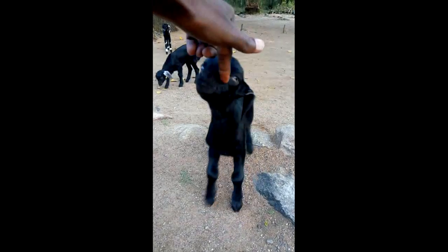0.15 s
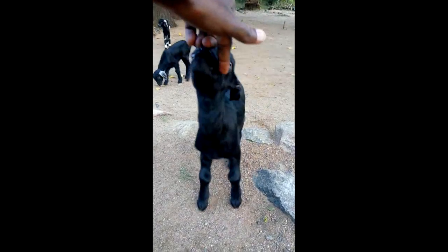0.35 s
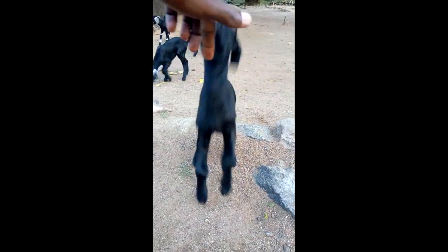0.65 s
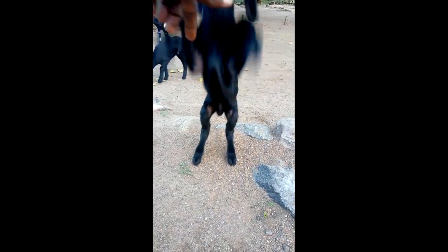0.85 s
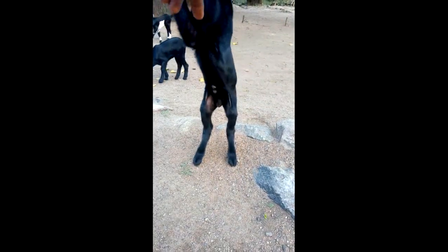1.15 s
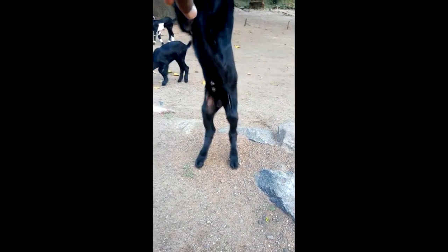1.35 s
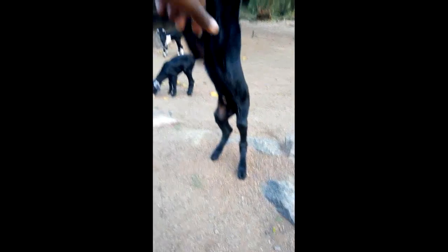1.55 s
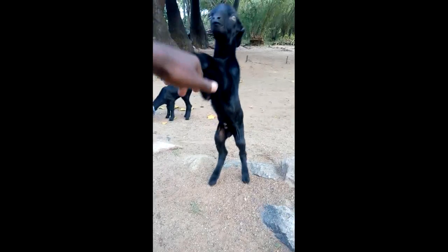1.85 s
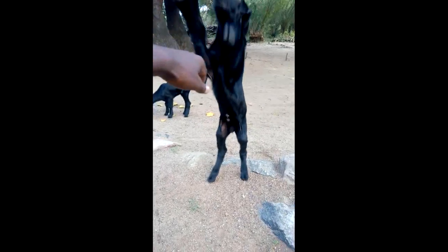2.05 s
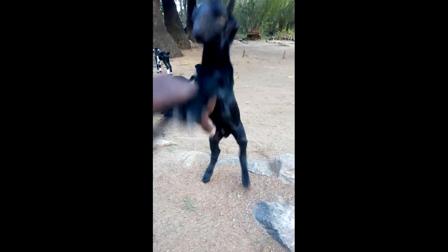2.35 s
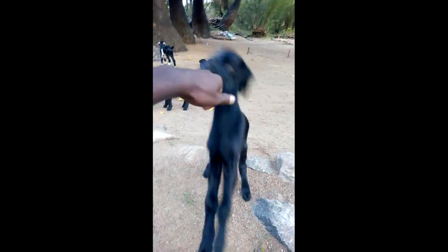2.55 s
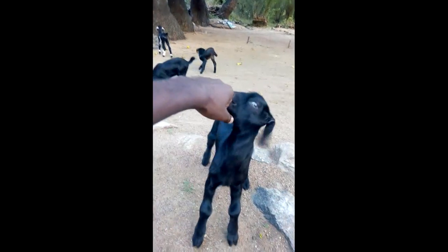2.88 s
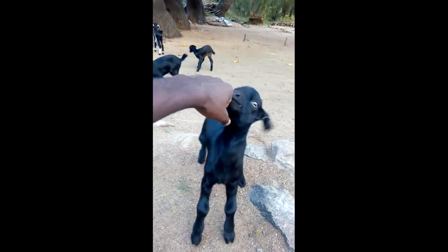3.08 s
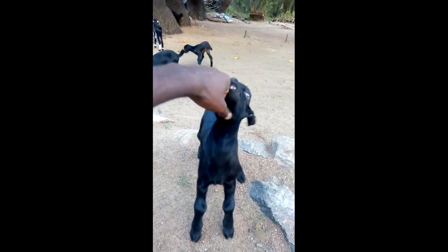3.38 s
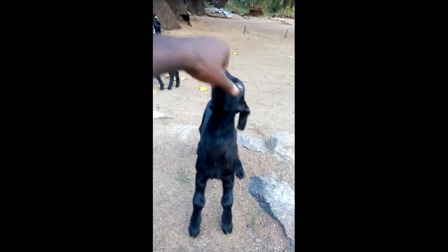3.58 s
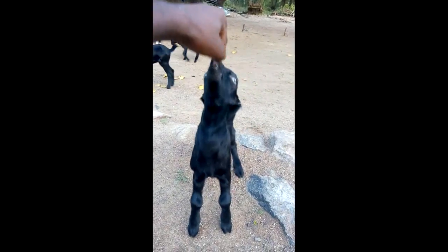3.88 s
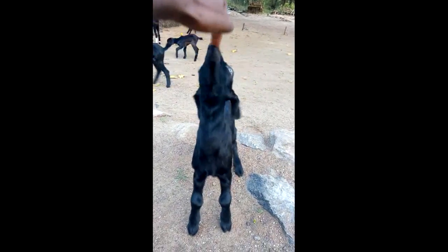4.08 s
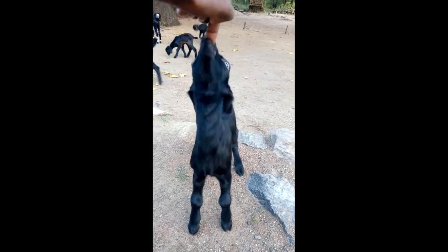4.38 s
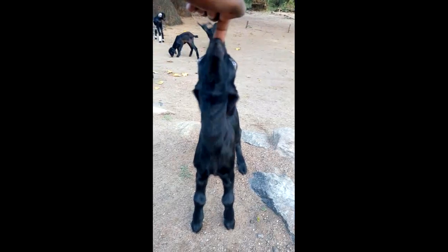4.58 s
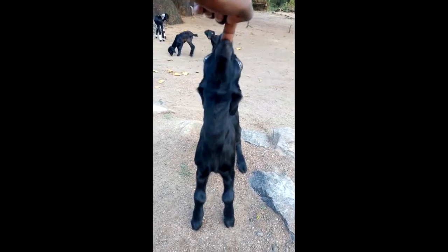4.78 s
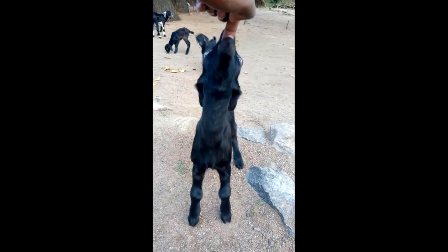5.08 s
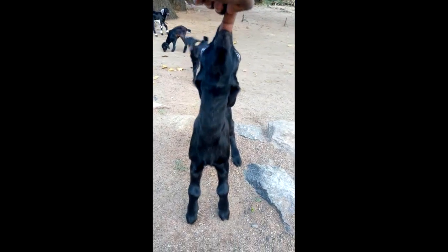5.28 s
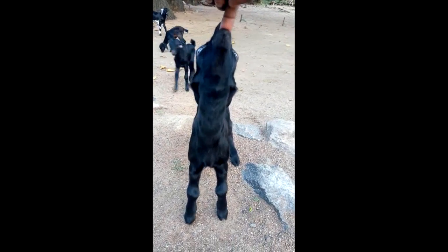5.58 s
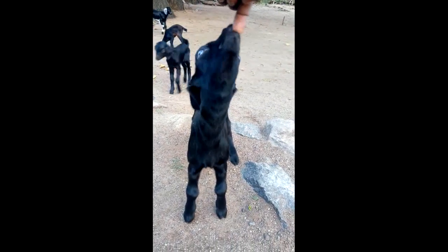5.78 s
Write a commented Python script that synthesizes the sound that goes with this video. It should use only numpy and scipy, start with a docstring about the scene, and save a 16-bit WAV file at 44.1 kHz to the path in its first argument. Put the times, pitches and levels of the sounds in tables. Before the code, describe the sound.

Young goats bleat outdoors on a farm, their trembling calls coming first from a distance and then from right by the microphone. After the loudest bleat, a crow gives three evenly spaced, rasping caws while another kid answers faintly. Hooves lightly scuff the gritty ground and dull thuds sound on the left. The calls carry a slight echo over quiet rumble and hiss.

```python
"""Goat kids near and far bleat in a bare farmyard: pushes of the belly drive the vocal folds, so each
call throbs about eleven times a second; the near kid opens with a yelp. Then a crow caws three times from
a tree, its voice chopped by a fluttering membrane. Far animals call faintly, two birds chirp, hooves
scuff the grit and a hollow body thuds on the left, over distant rumble and hiss. Reflections from walls
and trunks give the calls a tail; two microphone ports hear them unequally."""
import sys
import numpy as np
from scipy import signal
from scipy.fft import rfft, irfft, next_fast_len
from scipy.io import wavfile
from scipy.ndimage import uniform_filter1d

SR = 44100
rng = np.random.default_rng(int(sys.argv[2]) if len(sys.argv) > 2 else 0)


def to_wav(sig):
    """Store sig (one row per channel, or 1-D mono) as 16-bit WAV at the path in sys.argv[1].

    Samples outside -1..1 are clipped; the rate is SR.
    """
    pcm = np.clip(np.atleast_2d(sig), -1, 1) * 32767
    pcm = np.round(pcm).astype(np.int16)
    wavfile.write(sys.argv[1], SR, pcm.T)  # frames by channels


N = 261954


def gain_of(db):
    """Amplitude ratio of a level in decibels."""
    return 10 ** (np.asarray(db) / 20)


def unit_rms(x):
    """Normalisation to a mean power of one."""
    return x / np.sqrt(np.mean(x ** 2) + 1e-20)


def curve_at(points, hz, column=1):
    """Interpolation of a table on a logarithmic frequency axis."""
    table = np.transpose(points)
    return np.interp(np.log(hz + 1), np.log(table[0] + 1), table[column])


def add(mix, start_s, sound):
    """Superposition: a sound joins the mix at its start time."""
    part = mix[..., max(round(start_s * SR), 0):][..., :sound.shape[-1]]
    part += sound[..., :part.shape[-1]]


def wobble(size, hz):
    """Low-pass noise of rms 1, changing about hz times a second."""
    span = int(SR / hz)
    return unit_rms(uniform_filter1d(uniform_filter1d(rng.standard_normal(size), span), span))


def resonate(x, hz, width_hz):
    """A movable resonance by heterodyning: shift hz down to zero, smooth, shift back."""
    carrier = np.exp(2j * np.pi * np.cumsum(hz * np.ones(len(x))) / SR)
    pole = np.exp(-np.pi * width_hz / SR)
    return 2 * (carrier * signal.lfilter([1 - pole], [1, -pole], x / carrier + 1e-18)).real


def panned(x, db, lag_samples=0):
    """Direction cues: the left is db louder, the right lags."""
    return np.array([x, np.roll(x, lag_samples)]) * gain_of([[db / 2], [-db / 2]])


def air():
    """Distant rumble and hiss: partly coherent noise whose slow swell moves the bass most."""
    # Each row: frequency in Hz, relative spectral density in dB.
    spectrum = [(20, -31.5), (50, -34.5), (90, 7), (170, 0), (300, -7), (450, -9), (750, -17.5),
                (1200, -20), (2300, -18), (3200, -26), (5000, -24), (7000, -25), (9000, -34.5),
                (12500, -41), (15000, -29.5)]
    # Each row: frequency in Hz, left-right correlation.
    coherence = [(60, 0.54), (180, 0.94), (550, 0.9), (1650, 0.04), (4970, 0.077), (15000, 0.47)]
    frames, hz = N // 256 + 5, np.fft.rfftfreq(1024, 1 / SR)
    a, b, c, d, patches = rng.standard_normal((frames, 513, 5)).T
    patches = unit_rms(uniform_filter1d(uniform_filter1d(patches, 8, 0), 14, 1))
    swell = unit_rms(uniform_filter1d(rng.standard_normal(frames), 30))
    shared = curve_at(coherence, hz)[:, None]
    left, independent = a + 1j * b, c + 1j * d
    spectra = np.array([left, shared * left + np.sqrt(1 - shared ** 2) * independent])
    spectra *= gain_of(curve_at(spectrum, hz)[:, None] + 2 * patches + 3.5 * swell / (1 + hz[:, None] / 600))
    return gain_of(-63.5) * unit_rms(signal.istft(spectra, nperseg=1024, noverlap=768)[1][:, :N])


def calls_and_yelp():
    """Faint calls, chirps and the yelp that opens the near kid's bleat: three gliding harmonics."""
    # Each row: start and length in seconds, level in dB, first, middle and last pitch in Hz,
    # tilt in dB per harmonic. The yelp starts at 3.11 s.
    calls = [(0.0, 0.045, -63.5, 412, 393, 410, -20), (0.257, 0.039, -64.5, 2303, 2150, 1800, -30),
             (0.911, 0.19, -58.5, 299.7, 414, 370, -25), (1.096, .07, -62, 330, 314, 260, -21),
             (1.954, 0.039, -60, 333, 310, 270, -18), (1.987, 0.12, -63.5, 457, 375, 470, -28),
             (2.36, 0.13, -55.5, 619, 674, 570, 6), (2.8, 0.15, -61, 493, 505, 550, 5.5),
             (3.11, 0.0686, -50.5, 445, 545, 570, -8), (3.253, 0.21, -52, 621, 626, 577, -18.5),
             (3.561, .11, -54, 548, 520, 460, -35), (3.853, 0.2, -56.5, 563, 650, 740, -32),
             (3.861, 0.11, -64.5, 386, 405, 460, -23), (4.062, 0.2, -60, 373, 430, 290, -15),
             (4.54, .14, -54.5, 581, 630, 750, 6.5), (4.766, 0.29, -59.5, 297.4, 390, 270, -28),
             (4.822, 0.23, -50, 697.5, 680, 760, -22), (4.994, 0.11, -61, 310, 350, 280, -21),
             (5.499, 0.05, -59, 420, 410, 470, -24.5), (5.633, 0.18, -65.5, 441, 420, 400, -16),
             (5.657, 0.013, -62.5, 4150, 4100, 6100, -31)]
    out = np.zeros((2, N))
    for start, length, db, *glide_hz, tilt_db in calls:
        progress = np.arange(0, length, 1 / SR) / length
        level = gain_of(db + np.interp(progress, [0, .2, .63, 1], [-9.5, 0, 0, -9.5]))
        hz = np.interp(progress, [0, .5, 1], glide_hz)
        cycles = np.cumsum(hz * (1 + .015 * wobble(len(hz), 100))) / SR
        note = sum(gain_of(tilt_db * k) * np.cos(2 * np.pi * k * cycles) for k in range(1, 4))
        add(out, start, level * unit_rms(note) * signal.windows.tukey(len(hz), .2))
    return out


def hoof_scuffs():
    """Granular noise: grit grains of very unequal size make short band-limited scuffs and knocks."""
    # Each row: start in seconds, level in dB, length in seconds, centre in Hz, left minus right in dB.
    scuffs = [(.005, -69, 0.035, 5500, 2), (0.153, -58.5, 0.069, 2920, -1.5), (.185, -61, 0.024, 5050, 8),
              (0.22, -60.5, 0.014, 5760, 8), (0.28, -61, 0.02, 2850, 2), (0.598, -66, 0.047, 7700, 8),
              (.671, -72.5, .04, 5660, 1), (0.788, -70, 0.018, 4760, -5), (0.985, -63.5, .012, 790, 1),
              (1.538, -73, 0.025, 8750, 1), (1.785, -57, 0.037, 4700, 11), (1.952, -71, 0.011, 800, 1),
              (2.441, -71, 0.06, 13300, 16), (2.696, -65, 0.035, 12080, 9), (4.939, -69.5, 0.055, 7200, 0),
              (5.002, -69, 0.044, 7400, 2), (5.25, -75, .028, 4500, 14), (5.692, -69, 0.016, 4860, 1),
              (5.784, -74, 0.013, 5950, -4)]
    size, spread_octaves = 8192, .84
    out = np.zeros((2, N))
    hz, t = np.fft.rfftfreq(size, 1 / SR), np.arange(size) / SR
    for start, db, length, centre_hz, pan_db in scuffs:
        grit = rng.standard_normal(size) * gain_of(3.6 * wobble(size, 500))
        band = np.exp(-(np.log2((hz + 1) / centre_hz) / spread_octaves) ** 2)
        swell = np.minimum(t / (.25 * length), 1) * np.exp(-(t / length) ** 2)
        add(out, start, panned(gain_of(db) * unit_rms(irfft(rfft(grit) * band)) * swell, pan_db))
    return out


def thuds():
    """Forced vibration: a short rumbling push shakes a hollow body, which hums while it lasts."""
    # Each row: start in seconds, level in dB, length in seconds, strongest mode in Hz.
    pushes = [(0.523, -56, 0.058, 104), (0.592, -57.5, 0.058, 166), (2.777, -57.5, 0.078, 239),
              (2.865, -47.5, 0.091, 169), (3.252, -50, 0.039, 226), (3.312, -48.5, 0.095, 172.6),
              (3.484, -54.5, 0.064, 170.6), (3.679, -56.5, 0.087, 245), (3.758, -46, 0.086, 169.6),
              (4.063, -43.5, 0.09, 167), (4.602, -58, 0.047, 187), (4.91, -54.5, 0.039, 254.5),
              (5.187, -50.5, 0.056, 246), (5.247, -46, 0.091, 165.5), (5.791, -57.5, 0.064, 219)]
    # Each row: frequency and bandwidth in Hz, relative level in dB.
    weak_modes = [(90, 54, -9), (238, 77, -13.5), (284, 20, -22.5)]
    out, t = np.zeros(N), np.arange(0, .3, 1 / SR)
    for start, db, length, hz in pushes:
        push = np.minimum(t / .0043, 1) * np.exp(-(t / length) ** 4)
        hum = np.sin(2 * np.pi * np.cumsum(hz * (1 + .05 * wobble(len(t), 40))) / SR)
        shake = rng.standard_normal(len(t))
        body = sum(gain_of(mode_db) * unit_rms(resonate(resonate(shake, f, width), f, width))
                   for f, width, mode_db in weak_modes)
        add(out, start, gain_of(db) * push * (hum + body))
    return out


def bleat(pushes, throat, dip_db, sag, jitter, breath_db, pan_db):
    """Source and filter: each belly push lifts level and pitch; the throat shapes voice and breath."""
    rise_s, first_dip_db, late_sag = .04, 5, .8
    peak_s, push_db, push_hz = np.transpose(pushes)
    # A push harder than the last starts from a deeper dip.
    dips_db = np.r_[first_dip_db, dip_db + .47 * np.maximum(np.diff(push_db), 0)]
    t = np.arange(peak_s[0] - rise_s, peak_s[-1] + .045, 1 / SR)
    knots = np.r_[np.ravel([peak_s - rise_s, peak_s], "F"), t[-1]]
    slack = np.cos(np.pi / 2 * np.interp(t, knots, np.arange(len(knots)))) ** 2  # 0 at a push, 1 between
    scoop = slack * np.interp(t, knots - .01, np.resize([1, late_sag], len(knots)))
    unevenness = jitter * (1 + 2.5 * slack) * wobble(len(t), 150)  # slack folds run unevenly
    hz = np.interp(t, peak_s, push_hz) * (1 - sag * scoop + unevenness)
    cycles = np.cumsum(hz) / SR
    effort_db = np.interp(t, peak_s, push_db)
    dull_db = .49 * (effort_db - push_db.max())  # per octave: soft pushes lose overtones
    voice = sum(gain_of(curve_at(throat, k * hz) + dull_db * np.log2(k) + 4 * wobble(len(t), 70))
                * np.cos(2 * np.pi * (k * cycles + rng.random())) for k in range(1, 19))
    noise = rfft(rng.standard_normal(len(t)))
    breath = irfft(noise * gain_of(curve_at(throat, np.fft.rfftfreq(len(t), 1 / SR))), len(t))
    sound = voice / np.sqrt(uniform_filter1d(voice ** 2, 4000) + 1e-9) * gain_of(-11 * slack)
    sound += gain_of(breath_db + dull_db + 4 * slack) * unit_rms(breath)  # air leaks between pushes
    level = gain_of(effort_db - np.interp(t, peak_s - rise_s, dips_db) * slack)
    return t[0], panned(level * sound * signal.windows.tukey(len(t), .04), pan_db)


def goat_kids():
    """Five bleats, each coloured by the formants of a different throat and mouth."""
    # One list a bleat. Each row: time of a belly push in seconds, effort in dB, pitch in Hz.
    bleats = [
        [(1.204, -55.5, 556.5), (1.285, -48, 610.6), (1.364, -49.5, 621), (1.445, -47.5, 631),
         (1.532, -48, 625.7), (1.628, -48, 621.4), (1.711, -48, 610.5), (1.803, -51.5, 532)],
        [(2.303, -53, 750), (2.38, -46, 744), (2.455, -44, 771.7), (2.54, -44.5, 765), (2.607, -43.5, 784),
         (2.685, -45.5, 783.3), (2.777, -42.5, 779.4), (2.872, -47.5, 786)],
        [(2.97, -53.5, 632), (3.04, -57, 637), (3.13, -57.5, 614)],
        [(3.232, -44.5, 650), (3.312, -34.5, 673), (3.41, -33.5, 649.8), (3.495, -32.5, 665.3),
         (3.587, -34.5, 651.5), (3.685, -40, 629), (3.762, -42, 570.5), (3.85, -60.5, 519)],
        [(4.6, -68.5, 641), (4.7, -64.5, 647), (4.8, -64, 684), (4.9, -65, 649), (5.0, -67.5, 644),
         (5.1, -76, 633)],
    ]
    # Vocal tract responses. Each row: frequency in Hz, gain in dB.
    far_throat = [(400, 1.5), (620, 0.5), (1240, -12), (1870, -14.5), (2500, -3.5), (3100, -23),
                  (4300, -18.5), (6000, -14), (6900, -27), (7800, -42), (10000, -47), (14000, -90)]
    shrill_throat = [(500, -47), (770, -28), (1540, -10.5), (2300, 2), (3100, -11), (3850, -16),
                     (4650, 2.5), (5400, -3.5), (7000, -0.5), (7800, -12.5), (8800, -21.5), (10000, -56),
                     (14000, -101)]
    faint_throat = [(630, -3.2), (1270, -2.5), (1900, -24), (2500, 11), (3200, -5), (4300, 5), (5500, -8),
                    (8000, -35), (14000, -65)]
    near_throat = [(400, -16), (650, -12), (1300, -10.5), (1970, -0.5), (2600, 1), (3250, -16.5),
                   (3900, -0.5), (4600, -5.5), (5300, -4.5), (6000, 4), (7200, -6.5), (8300, -14.5),
                   (10000, -36), (14000, -92)]
    distant_throat = [(600, -37), (2500, -6), (4000, 2), (5000, -6), (6500, -24), (9000, -40), (14000, -77)]
    far, shrill, faint, near, distant = bleats
    out = np.zeros((2, N))
    add(out, *bleat(far, far_throat, dip_db=4, sag=.1, jitter=.011, breath_db=-18.5, pan_db=-1))
    add(out, *bleat(shrill, shrill_throat, dip_db=0, sag=.025, jitter=.006, breath_db=-16, pan_db=0))
    add(out, *bleat(faint, faint_throat, dip_db=-.2, sag=.0298, jitter=.0071, breath_db=-7, pan_db=3.5))
    add(out, *bleat(near, near_throat, dip_db=3, sag=.08, jitter=.005, breath_db=-17, pan_db=-2.5))
    add(out, *bleat(distant, distant_throat, dip_db=1.5, sag=.071, jitter=.0074, breath_db=-2.6,
                    pan_db=4.2))
    return out


def far_rasps():
    """Hoarse calls of far animals: noise filtered by one wide resonance."""
    # Each row: start and length in seconds, level in dB, centre in Hz.
    rasps = [(2.366, 0.21, -52.5, 1950), (2.776, 0.094, -58.5, 1640)]
    out = np.zeros((2, N))
    for start, length, db, hz in rasps:
        t = np.arange(0, length, 1 / SR)
        noise = resonate(resonate(rng.standard_normal(len(t)), hz, 1200), hz, 660)
        swell = np.minimum(t / .012, 1) * gain_of(db - 2 * (t / length) ** 2)
        add(out, start, swell * unit_rms(noise) * signal.windows.tukey(len(t), .1))
    return out


def caw(length, top_db, top_hz, first_flutter_hz, last_flutter_hz, hoarse, throat_db, shut_hz, ring_db):
    """Amplitude and frequency modulation: a second membrane flutters, chopping and bending the voice."""
    # Steady resonances of the crow. Each row: frequency and bandwidth in Hz, gain in dB.
    body_modes = [(630, 220, -22), (950, 400, -32), (1530, 300, -2), (2400, 250, -32)]
    attack_s, release_s, open_beak_hz = .088, .068, 3724
    crest, scoop, sag = .35, .06, .15  # pitch tops at this share of the length; shares lost at the ends
    t = np.arange(0, length, 1 / SR)
    progress = t / length
    slack = np.interp(t, [0, attack_s, length - release_s, length], [1, 0, 0, 1]) ** 2.25
    level = gain_of(top_db - 24.5 * slack) * signal.windows.tukey(len(t), .04)
    hz = top_hz * (1 - np.where(progress < crest, scoop * (1 - progress / crest) ** 2,
                                sag * ((progress - crest) / (1 - crest)) ** 2))
    flutter_hz = np.interp(progress, [0, 1], [first_flutter_hz, last_flutter_hz])
    flutter = 2 * np.pi * np.cumsum(flutter_hz * (1 + .12 * hoarse * wobble(len(t), 80))) / SR
    cycles = np.cumsum(hz * (1 + .088 * np.sin(flutter) + .0295 * hoarse * wobble(len(t), 260))) / SR
    chop = 1 - (1.1 - hoarse) * ((1 + np.cos(flutter)) / 2) ** 2  # a brief partial closure each flutter
    voice = sum(np.cos(2 * np.pi * k * cycles) for k in range(1, 8))
    drive = chop * (unit_rms(voice) + 2.84 * hoarse * rng.standard_normal(len(t)))
    windpipe = (3 * hz, 330, 0)  # follows the third harmonic
    throat = (1393.6 - 78.5 * progress, 220, throat_db - 5 * progress)
    beak_hz = np.interp(progress, [.24, .55], [shut_hz, open_beak_hz])
    beak_db = ring_db + np.interp(progress, [0, .24, 1], [-28.5, 0, -41])
    modes = [windpipe, throat, (beak_hz, 220, beak_db)] + body_modes
    sound = sum((-1) ** k * gain_of(db) * resonate(resonate(resonate(drive, f, w), f, w), f, 2 * w)
                for k, (f, w, db) in enumerate(modes))
    steady = sound / np.sqrt(uniform_filter1d(sound ** 2, 2000) + 1e-9)
    return panned(level * steady, 4.1, lag_samples=13)


def crow():
    """Three caws from one perch, placed to the left by level and arrival time."""
    # Each row: start and length in seconds, effort in dB, top pitch in Hz, first and last flutter rate
    # in Hz, hoarseness from 0 to 1, throat gain in dB, first beak resonance in Hz, its peak gain in dB.
    caws = [(4.037, 0.37, -34, 585.3, 100.5, 100, 0.49, -3, 3500, -18.5),
            (4.636, 0.39, -33.5, 609.9, 107, 86.6, 0.71, 2.5, 3060, -8),
            (5.35, .39, -35, 621.7, 104, 94, 0.62, 3, 3060, -6.5)]
    out = np.zeros((2, N))
    for start, *settings in caws:
        add(out, start, caw(*settings))
    return out


def yard_reverb(x):
    """Reverberation: sparse reflections of random sign, each band decaying at its own rate."""
    # Each row: frequency in Hz, time to fall 60 dB in seconds, relative level in dB.
    decay = [(200, .5, -8), (1000, .45, -10), (2000, .55, -3), (3000, .5, 0), (6000, .45, 0),
             (10000, .3, -4), (15000, .2, -10)]
    taps = np.zeros((2, SR))
    arrivals = np.arange(400, SR - 20, 20) + rng.integers(0, 20, (2, (SR - 401) // 20))
    np.put_along_axis(taps, arrivals, rng.choice([-1., 1.], arrivals.shape), 1)
    taps[1] = .68 * taps[0] + .76 * taps[1]  # the two sides are partly coherent
    hz, t, spectra = signal.stft(taps, SR, nperseg=256)
    spectra = spectra * gain_of(curve_at(decay, hz, 2)[:, None] - 60 * t / curve_at(decay, hz)[:, None])
    tail = signal.istft(spectra, SR, nperseg=256)[1]
    return signal.fftconvolve(x, tail / np.linalg.norm(tail[0]), axes=1)[:, :N]


def scene():
    """Direct sound, the yard's reverberation and the background add by superposition."""
    kids, caws = goat_kids(), crow()
    calls = calls_and_yelp() + far_rasps()
    grit = hoof_scuffs()
    reflected = gain_of(-6.5) * kids + gain_of(-15) * caws + gain_of(-3.5) * calls + gain_of(-21) * grit
    return kids + caws + calls + grit + thuds() + yard_reverb(reflected) + air()


def record(dry):
    """Frequency response of two ports: the right is mostly weaker, the left lags; both are low-passed."""
    # Each row: frequency in Hz, left minus right sensitivity in dB.
    imbalance = [(60, 5), (250, 10.5), (700, 6.5), (1300, 3.5), (1700, 9), (2300, 8), (3500, 1), (5000, 4),
                 (8000, 5.5), (14000, -1)]
    gain_db, lag_s, edge_hz = 2.5, .000175, 15640
    size = next_fast_len(N + 512)
    hz = np.fft.rfftfreq(size, 1 / SR)
    left = np.exp(-2j * np.pi * np.minimum(hz * lag_s, 1))  # the phase lag levels off at one cycle
    ports = gain_of(gain_db) * np.array([left, gain_of(-curve_at(imbalance, hz))])
    heard = irfft(rfft(dry, size) * ports, size)[:, :N]
    low_pass = signal.firwin(511, edge_hz, window=("kaiser", 9), fs=SR)
    return signal.oaconvolve(heard, low_pass[None], "same")


dry = scene()
out = record(dry)
to_wav(out)
```